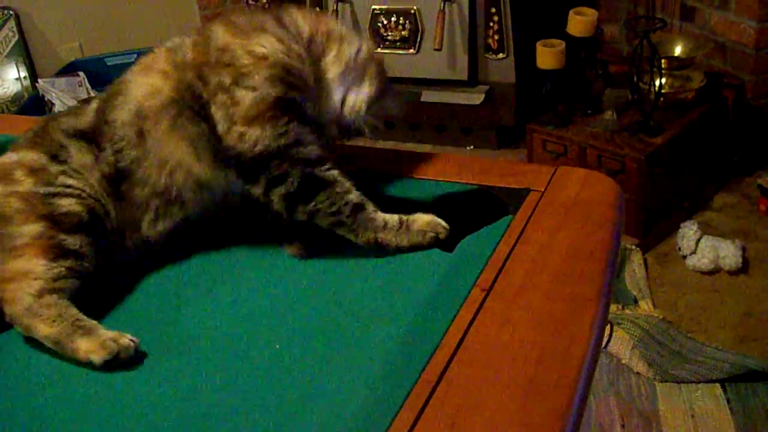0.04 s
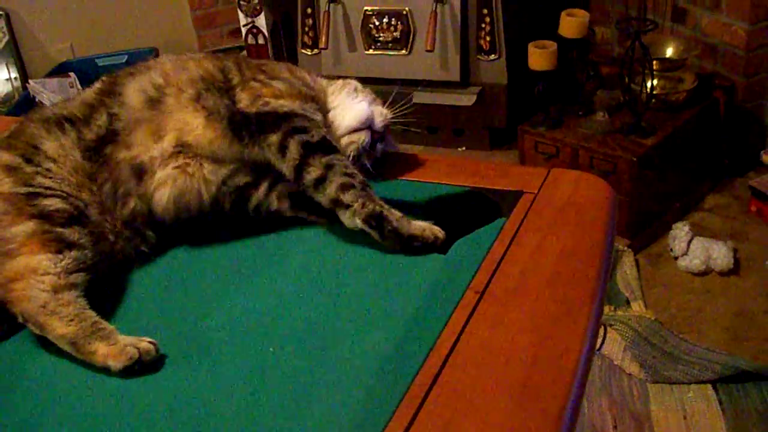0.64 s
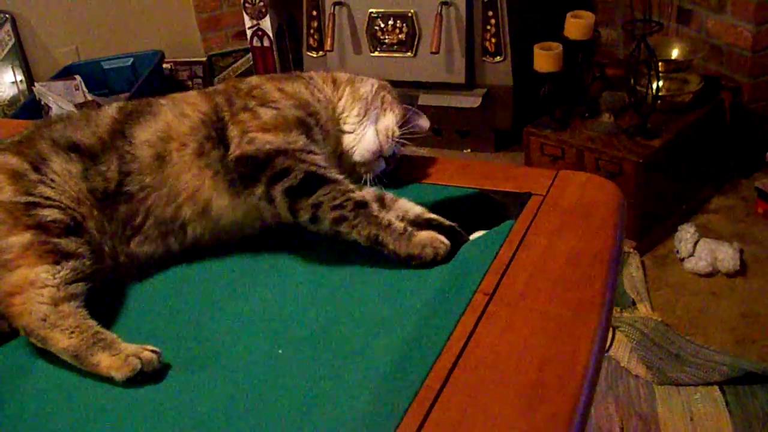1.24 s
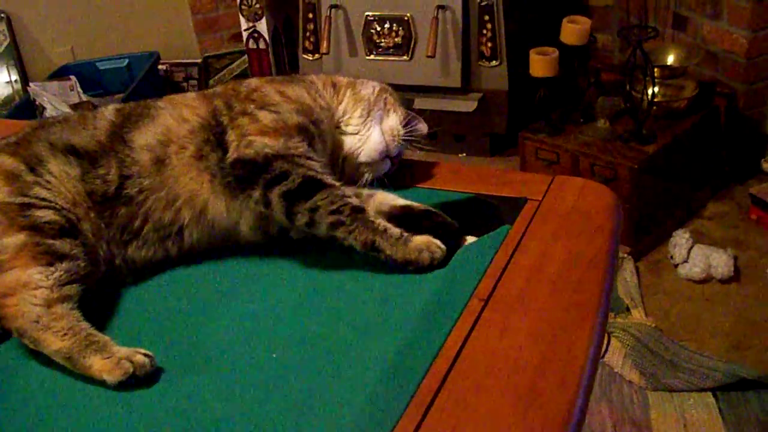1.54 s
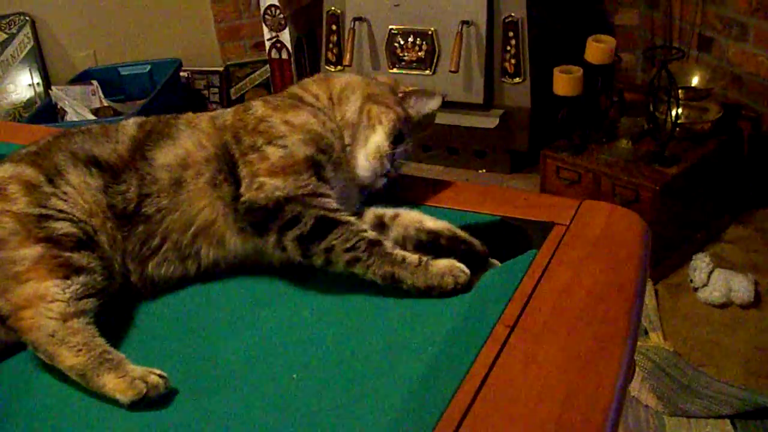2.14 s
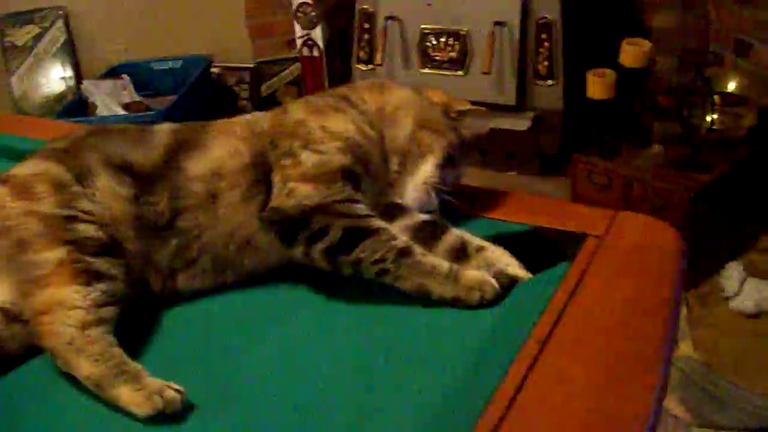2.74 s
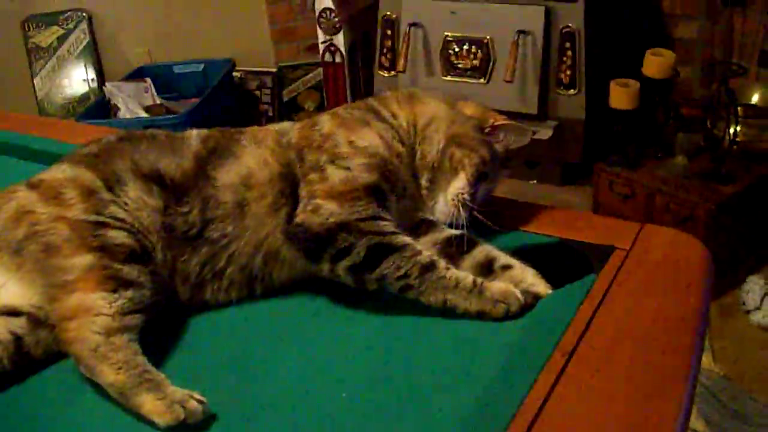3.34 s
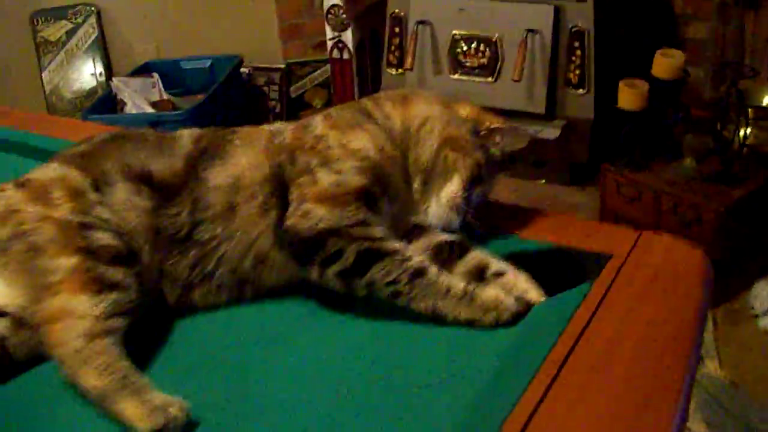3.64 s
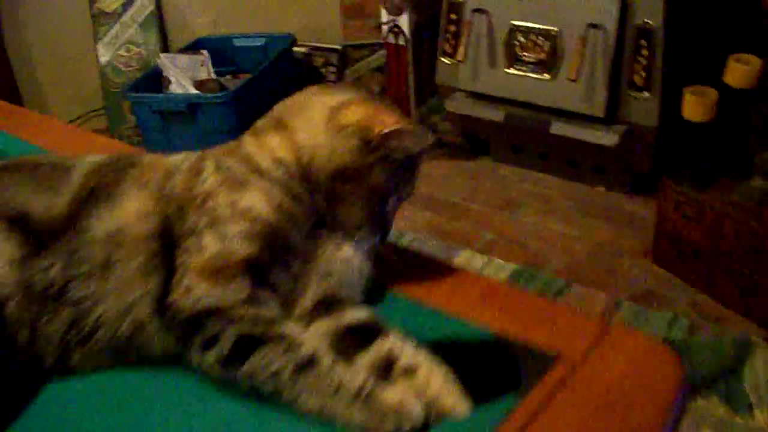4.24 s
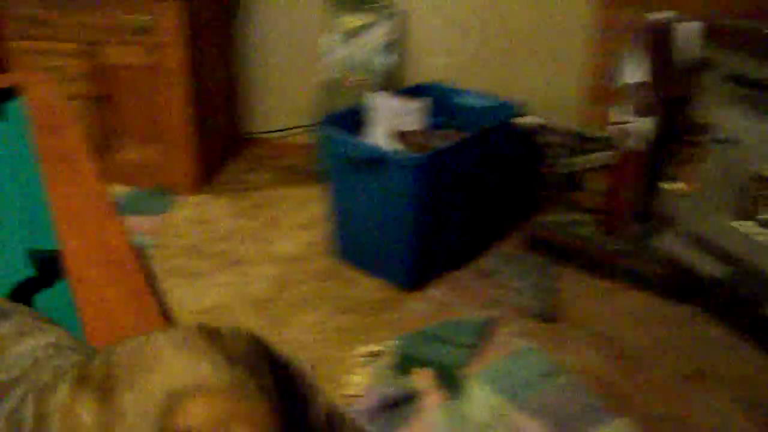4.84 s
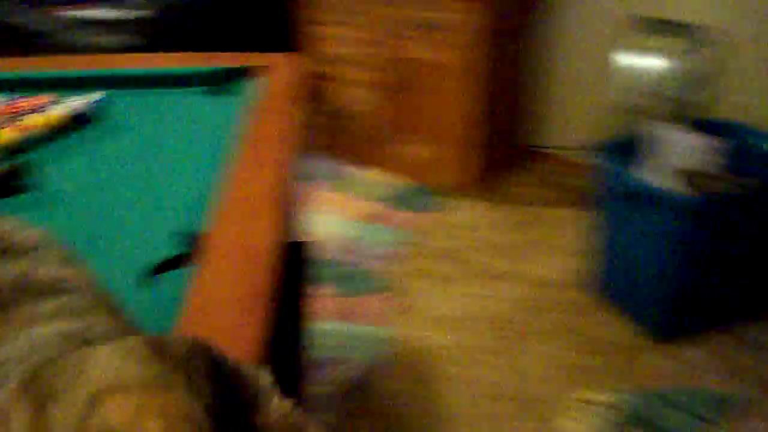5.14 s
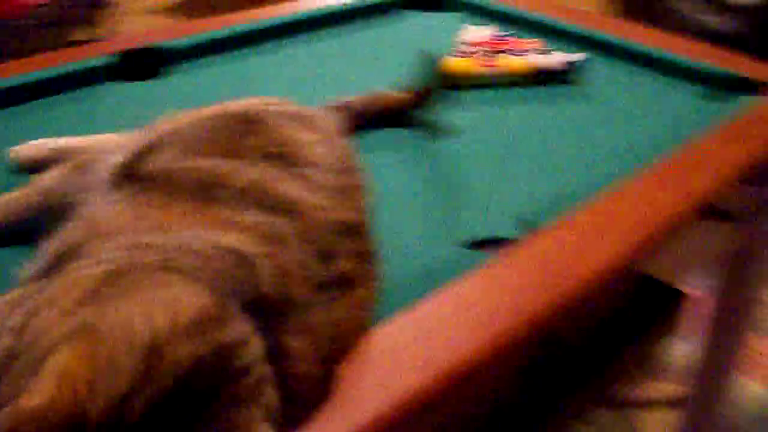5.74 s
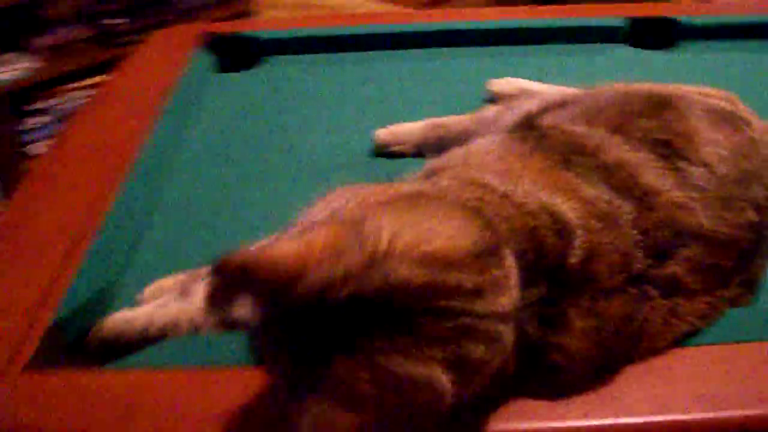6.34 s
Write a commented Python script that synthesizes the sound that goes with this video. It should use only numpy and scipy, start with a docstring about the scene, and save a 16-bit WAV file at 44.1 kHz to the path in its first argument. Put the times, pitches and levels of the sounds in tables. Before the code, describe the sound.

A billiard ball rattles into a pool table's corner pocket, close and dry, and settles in quicker, softer bounces. It then rolls through the wooden channels inside, rumbling hollowly, bumping over seams and knocking at the bends. The cabinet booms and the room echoes briefly, with the hardest blows slightly clipped. A low hum and flutter continue beneath, with a few faint ticks and a rustle.

```python
"""Cat pockets a billiard ball

A pool table in a quiet room, over low hum and flutter, with scratchy ticks and a faint, long rustle.
The batted ball strikes the corner pocket, near and dry, and settles in ever quicker bounces.
Then it rolls down the wooden return channels, hollow and roomy, bumping over seams and knocking
at each bend. The cabinet booms, the room answers, and the hardest blows are clipped."""
import sys
import numpy as np
from scipy import signal
from scipy.fft import rfft, irfft
from scipy.io import wavfile

SR = 44100
rng = np.random.default_rng(int(sys.argv[2]) if len(sys.argv) > 2 else 0)


def store_wav(level_fs):
    """Save 16-bit WAV to argv[1]."""
    pcm = np.round(np.clip(np.atleast_2d(level_fs), -1, 1) * 32767)
    wavfile.write(sys.argv[1], SR, pcm.T.astype(np.int16))


N = 285768


def amp(db):
    """Decibels to gain."""
    return 10 ** (np.asarray(db) / 20)


def unit_rms(x):
    """Scales to rms 1."""
    return x / np.sqrt(np.mean(x ** 2) + 1e-20)


def curve(points, hz):
    """Reads a table on a log-frequency axis."""
    f, value = np.transpose(points)
    return np.interp(np.log(hz + 1), np.log(f + 1), value)


def add(mix, start_s, sound):
    """Mixes a sound in at its start time."""
    part = mix[round(start_s * SR):][:len(sound)]
    part += sound[:len(part)]


def resonance(hz, centre_hz, q):
    """Gain of two equal band-pass stages in series."""
    return 1 / (1 + (q * (hz / centre_hz - centre_hz / (hz + 1))) ** 2)


def noise(spectrum):
    """Steady noise of rms 1, coloured by a table of f/Hz, level/dB."""
    gain = amp(curve(spectrum, np.fft.rfftfreq(N, 1 / SR)))
    return unit_rms(irfft(rfft(rng.standard_normal(N)) * gain, N))


def drift(rate_hz):
    """Slow random wander of rms 1."""
    gain = np.exp(-(np.fft.rfftfreq(N, 1 / SR) / rate_hz) ** 2)
    return unit_rms(irfft(rfft(rng.standard_normal(N)) * gain, N))


def pulse(gain):
    """The minimum-phase pulse that has this spectrum."""
    log_gain = np.log(np.maximum(np.r_[gain, gain[-2:0:-1]], 1e-5))
    return np.fft.ifft(np.exp(np.conj(signal.hilbert(log_gain)))).real


def fuzzy_tone(hz, waver, waver_hz):
    """A tone of rms 1 that follows a pitch curve, unsteady in level and phase."""
    unsteady = (1 + waver * (drift(waver_hz) + 1j * drift(waver_hz))) / np.sqrt(1 + 2 * waver ** 2)
    return np.sqrt(2) * (unsteady * np.exp(2j * np.pi * np.cumsum(hz) / SR)).real


def reflections(t60s, rise_s):
    """A dense train of reflections of energy 1, each band dying at its own speed."""
    hz, t, bands = signal.stft(rng.choice([-1., 1.], SR), SR, nperseg=256)
    decay = amp(-60 * t / curve(t60s, hz)[:, None])
    tail = signal.istft(bands * decay, SR, nperseg=256)[1][:SR]
    tail *= 1 - np.exp(-np.arange(SR) / SR / rise_s)
    return tail / np.linalg.norm(tail)


def room_tone(air_db=-44.5, flutter_hz=18.2, flutter_db=-32.5, hum_hz=122.3, hum_db=-59):
    """Room air, mains hum and a wavering flutter below the bass."""
    # colour of the air: f/Hz, relative level/dB
    air = [(15, -6), (35, 0.5), (50, -2), (75, -9.5), (100, -6), (140, -15.5), (185, -14.5), (250, -16),
           (350, -24), (600, -26), (1200, -32), (2500, -37.5), (5000, -41), (8000, -42)]
    t = np.arange(N) / SR
    flutter_phase = 2 * np.pi * np.cumsum(flutter_hz + 0.59 * drift(10.7)) / SR
    flutter = np.sin(flutter_phase) * amp(0.92 * drift(3.6))
    hum = np.sin(2 * np.pi * hum_hz * t) * amp(1.3 * drift(1.7))
    return amp(air_db) * noise(air) + np.sqrt(2) * (amp(flutter_db) * flutter + amp(hum_db) * hum)


def brushes(rows, q):
    """Soft contacts: each a swell of friction noise around one pitch, peaking at half its length."""
    out, t = np.zeros(N), np.arange(2 * SR) / SR
    hz = np.fft.rfftfreq(len(t), 1 / SR)
    for start, db, length, centre_hz in rows:
        rub = irfft(rfft(rng.standard_normal(len(t))) * resonance(hz, centre_hz, q))
        age = t / (length / 2)
        add(out, start, amp(db) * unit_rms(rub) * age * np.exp(1 - age))
    return out


def ticks_and_rustle():
    """Brief scratchy ticks and a faint, long rustle."""
    # strokes: t/s, level/dB, length/s, centre f/Hz
    strokes = [(2.725, -55.5, 0.043, 3500), (3.14, -57, 0.015, 3300), (3.207, -47, 0.0053, 6800),
               (3.208, -57, 0.022, 4100), (4.029, -42, 0.0017, 4500), (5.1, -68, 0.8, 2700)]
    return brushes(strokes, q=1.5)


def soft_bumps():
    """Dull bumps from the cat's body and from handling at the microphone."""
    # bumps: t/s, level/dB, length/s, centre f/Hz
    bumps = [(.255, -34, 0.03, 62.5), (0.6, -51, 0.22, 175), (.7275, -52, 0.008, 755),
             (5.07, -70, 0.086, 86.4), (5.56, -48, 0.07, 260), (6.24, -42.5, .14, 102)]
    return brushes(bumps, q=1.099)


def panel_ring(drive, ring_db):
    """Adds the lingering ring of the cabinet panels to the sound that drives them."""
    # panel modes: f/Hz, relative level/dB, t60/s
    modes = [(157.4, 8, 0.36), (184.1, 8.5, 0.23), (201.9, -1, 0.33), (245.4, -4, 0.25), (285, -16, 0.063),
             (318, -14.5, 0.97), (374, -6, 0.29), (452.7, -4, 0.98), (661, -10, 0.62), (729, -3, 0.19),
             (891, -6, 0.078), (1014, -9.5, 0.37)]
    t = np.arange(SR // 2) / SR
    ring = np.zeros(len(t))
    for hz, db, t60 in modes:
        damping = np.log(1000) / t60
        ring += amp(db) * 2 * damping / SR * np.exp(-damping * t) * np.sin(2 * np.pi * hz * t)
    return drive + amp(ring_db) * signal.fftconvolve(drive, ring)[:len(drive)]


def table_resonances():
    """Now and then one resonance of the table sings out after a blow or under the rolling ball."""
    # swells: start t/s, end t/s, peak level/dB, start f/Hz, end f/Hz
    swells = [(1.27, 1.48, -30.5, 190, 179), (3.011, 3.081, -39, 281, 298), (3.193, 3.271, -37, 302, 282),
              (3.656, 3.761, -31, 765, 657), (4.028, 4.147, -32, 175, 209), (4.124, 4.18, -20, 453, 453),
              (4.306, 4.54, -51.5, 330, 392), (6.244, 6.518, -30, 168.9, 198.8)]
    t, out = np.arange(N) / SR, np.zeros(N)
    for start, end, db, start_hz, end_hz in swells:
        progress = np.clip((t - start) / (end - start), 0, 1)
        tone = fuzzy_tone(start_hz + (end_hz - start_hz) * progress, waver=0.97, waver_hz=25)
        out += amp(db) * np.sin(np.pi * progress) * tone
    return out


def rolling(whirr_db=-2.5, uneven_db=2.0, ring_db=12.0, attack_s=0.026, release_s=0.27):
    """The ball runs over the wood grain and rings the panels; a drone slides in pitch as it travels."""
    # loudness of the roll, one list per run of channel: t/s, level/dB
    envelopes = [
        [(2.48, -54), (2.8, -49.5), (3.05, -46), (3.26, -43.5), (3.49, -51.5), (3.565, -44), (3.63, -45.5)],
        [(3.85, -46), (3.96, -34.5), (4.08, -37.5)],
        [(5.25, -61), (5.6, -54), (5.85, -55), (6.08, -52.5), (6.24, -43), (6.38, -45.5)],
    ]
    # hollowness of each run, relative to that loudness:
    # rumble level/dB, drone start f/Hz, end f/Hz, drone start level/dB, end level/dB
    runs = [(1.5, 186, 140, 7.5, -8.5), (-9, 84, 92, -19, -4), (0, 320, 370, -10.5, -5.5)]
    # colour of the low rumble: f/Hz, relative level/dB
    rumble_colour = [(60, -6.5), (100, -2.5), (135, -13), (180, -7.5), (230, -9), (300, 4.5), (380, 1.5),
                     (500, -18), (800, -49.5), (9000, -71.5)]
    # colour of the midrange whirr: f/Hz, relative level/dB
    whirr_colour = [(100, -67), (400, 4), (600, 0.5), (720, -2), (900, -2.5), (1100, -3.5), (1400, -18),
                    (3000, -29.5), (9000, -44.5)]
    t, out = np.arange(N) / SR, np.zeros(N)
    pressure = amp(uneven_db * drift(54))
    rumble = unit_rms(panel_ring(noise(rumble_colour) * pressure, ring_db))
    whirr = unit_rms(panel_ring(noise(whirr_colour) * pressure, ring_db))
    for envelope, (rumble_db, start_hz, end_hz, start_db, end_db) in zip(envelopes, runs):
        times, db = np.transpose(envelope)
        start, end = times[0], times[-1]
        gate = np.interp(t, [start - attack_s, start, end, end + release_s], [0, 1, 1, 0])
        loudness = gate * amp(np.interp(t, times, db))
        drone = fuzzy_tone(np.interp(t, [start, end], [start_hz, end_hz]), waver=0.54, waver_hz=36)
        drone *= amp(np.interp(t, [start, end], [start_db, end_db]))
        out += loudness * (amp(rumble_db) * rumble + amp(whirr_db) * whirr + drone)
    return out


def wood_blows(rows, boards, knock_q, clack_q, cabinet_t60, treble_t60, dull_hz,
               room_db, ring_db, splash_s, direct_db):
    """Each blow drives the wood and reaches the microphone straight, via the cabinet and via the room."""
    # broad thud of the cabinet: f/Hz, relative level/dB
    thud = [(40, -29.5), (100, -9), (145, -9.5), (190, -0.5), (300, 2.5), (450, -6), (600, -9.5),
            (1200, -24.5), (9000, -68.5)]
    # decay of the room: f/Hz, t60/s
    room_decay = [(100, 0.099), (250, 0.43), (600, 0.32), (1200, 0.44), (2500, 0.35), (5000, 0.47),
                  (8000, 0.36)]
    cabinet_decay = [(100, cabinet_t60), (1100, cabinet_t60), (2200, treble_t60)]
    hz, out = np.fft.rfftfreq(4096, 1 / SR), np.zeros(N)
    absorption = pulse(1 / np.hypot(1, hz / dull_hz))  # cloth and carpet dull the reflections
    for start, db, thud_db, knock_hz, clack_db, clack_hz, contact_hz, straight_db in rows:
        knock = resonance(hz, knock_hz, knock_q)
        clack = amp(clack_db) * resonance(hz, clack_hz, clack_q)
        parts = [amp(thud_db + curve(thud, hz)), amp(curve(boards, hz)), knock, clack]
        contact = 1 / np.hypot(1, (hz / contact_hz) ** 2)  # a longer contact cuts more treble
        strike = pulse(np.linalg.norm(parts, axis=0) * contact)
        cabinet = reflections(cabinet_decay, rise_s=0.0013)
        room = amp(room_db) * reflections(room_decay, rise_s=0.011)
        paths = signal.fftconvolve(cabinet + room, absorption)
        # the straight sound: a splash of reflections right beside the ball, and the direct pulse
        splash = rng.standard_normal(SR) * np.exp(-np.arange(SR) / SR / splash_s)
        paths[:SR] += amp(straight_db) * splash / np.linalg.norm(splash)
        paths[0] += amp(straight_db + direct_db)
        sound = panel_ring(signal.fftconvolve(strike, paths), ring_db)
        add(out, start, amp(db) * sound / np.std(sound[:SR // 20]))  # db sets the first 50 ms
    return out


def channel_knocks(rebound_s=0.004, rebound_softening=0.75):
    """Inside the table, hollow and roomy: dull bumps at seams, and knocks with a duller rebound."""
    # response of the channel boards: f/Hz, relative level/dB
    boards = [(100, -49.5), (400, -2.5), (580, -11), (720, 1.5), (1050, -9), (1550, -39), (2600, -19.5),
              (3300, -24), (4200, -21.5), (7500, -24), (9000, -21.5)]
    # bumps over seams: t/s, level/dB
    seams = [(2.683, -42.5), (2.8215, -52.5), (3.0283, -43.5), (3.0974, -49), (3.1767, -48.5), (3.211, -38),
             (3.973, -39.5), (5.183, -53.5), (6.1815, -46.5)]
    # knocks at bends: t/s, level/dB, thud/dB, knock f/Hz, clack/dB, clack f/Hz,
    # contact corner f/Hz, straight sound/dB, rebound against the knock/dB
    knocks = [(2.3452, -25.5, -18, 1000, -5.5, 1440, 1864, -3.5, 1),
              (3.6583, -23.5, -28.5, 750, -9, 2000, 3980, 0.5, 4.5),
              (3.8164, -26, -29, 860, -7.5, 1300, 1400, -0.5, -9.5),
              (3.8895, -36, -17, 865, -10, 1300, 1530, -4, -12),
              (4.0890, -34, 6.5, 865, -14.5, 2180, 2200, 3.5, -3),
              (4.1300, -23.5, -0.5, 748, -16.5, 2200, 2620, -4, -2),
              (4.1720, -30.5, 17, 707, -14, 2180, 3080, -2.5, -1.5),
              (4.6030, -21, -13, 934, -11, 1950, 1900, -0.5, 3),
              (4.7560, -29, -7, 740, -8, 1400, 1330, 4, 3),
              (6.4000, -28.5, 5, 810, -15.5, 1500, 1720, -8, -6),
              (6.414, -19, -0.5, 983, -34, 1400, 2060, -7, -8)]
    seam_colour = (-4, 670, -13, 2000, 1200, 1.5)  # columns as above, thud to straight sound
    rows = [(start, db, *seam_colour) for start, db in seams]
    for start, db, *colour, contact_hz, straight_db, rebound_db in knocks:
        rebound_hz = contact_hz * rebound_softening
        rows.append((start, db, *colour, contact_hz, straight_db))
        rows.append((start + rebound_s, db + rebound_db, *colour, rebound_hz, straight_db))
    return wood_blows(rows, boards, knock_q=1.79, clack_q=2.64, cabinet_t60=0.096, treble_t60=0.06,
                      dull_hz=6960, room_db=1.5, ring_db=0.5, splash_s=0.00053, direct_db=-3.5)


def pocket_drop(knock_hz=623, bounces=7, first_flight_s=0.0303, restitution=0.7):
    """At the open pocket, near and dry: the ball rattles in, then bounces ever quicker and softer."""
    # response of the pocket boards: f/Hz, relative level/dB
    boards = [(100, -34), (400, -2.5), (750, -8.5), (1050, -4), (1350, -8.5), (2500, -13.5), (5000, -13.5),
              (7500, -12.5), (9000, -18)]
    # blows on the pocket's sides: t/s, level/dB, thud/dB, clack/dB, clack f/Hz,
    # contact corner f/Hz, straight sound/dB
    rattle = [(1.0229, -21, 0, 0.5, 2187, 4600, 7), (1.0250, -18.5, 2.5, 1, 2210, 2540, 5),
              (1.0622, -35, 2, -4, 3800, 6650, 1.5), (1.1171, -19.5, 2.5, -6.5, 2540, 2750, 0),
              (1.1858, -24, 2.5, -5, 2880, 2300, -0.5), (1.2504, -24, 13, 4, 2860, 2120, -1)]
    rows = [(start, db, thud_db, knock_hz, *rest) for start, db, thud_db, *rest in rattle]
    bounce_s, thud_db, clack_db, clack_hz, straight_db = 1.2949, 4, 0.5, 2840, 0.5
    for k in range(bounces):
        db = -23.5 - 2.94 * k
        contact_hz = 1940 * 0.88 ** k
        rows.append((bounce_s, db, thud_db, knock_hz, clack_db, clack_hz, contact_hz, straight_db))
        bounce_s += first_flight_s * restitution ** k
    return wood_blows(rows, boards, knock_q=4.6, clack_q=2.95, cabinet_t60=0.31, treble_t60=0.1,
                      dull_hz=2554, room_db=-3.0, ring_db=1.5, splash_s=0.0013, direct_db=-4.5)


def scene():
    """Ball, table, small noises and room as they arrive at one microphone."""
    ball = pocket_drop() + channel_knocks() + rolling() + table_resonances()
    return (ball + ticks_and_rustle() + soft_bumps() + room_tone())[None]


def record(dry, ceiling=0.72, edge_hz=8900):
    """The microphone loses the top treble. The hardest blows are then clipped, and a low-pass follows."""
    # treble fall of the microphone: f/Hz, level/dB
    treble_fall = [(20, 0), (7500, 0), (7900, -5), (8200, -13), (9000, -17)]
    microphone = pulse(amp(curve(treble_fall, np.fft.rfftfreq(1024, 1 / SR))))
    heard = signal.oaconvolve(dry, microphone[None])[:, :N]
    clipped = heard / (1 + (heard / ceiling) ** 8) ** (1 / 8)
    low_pass = signal.firwin(301, edge_hz, window=("kaiser", 9), fs=SR)
    return signal.oaconvolve(clipped, low_pass[None], "same")


dry = scene()
out = record(dry)
store_wav(out)
```